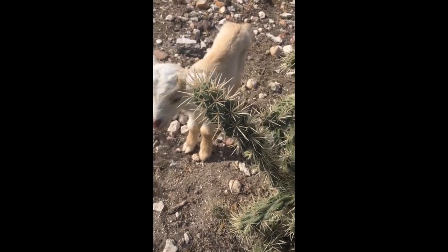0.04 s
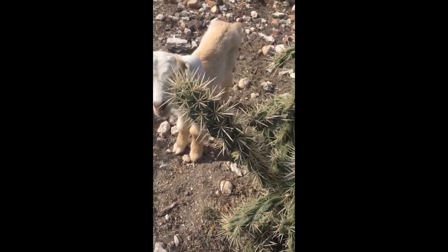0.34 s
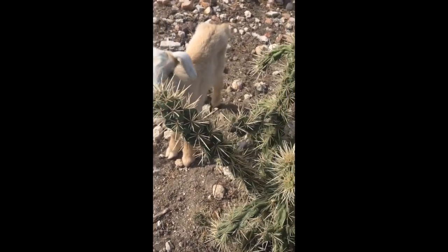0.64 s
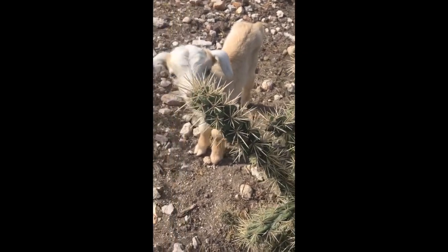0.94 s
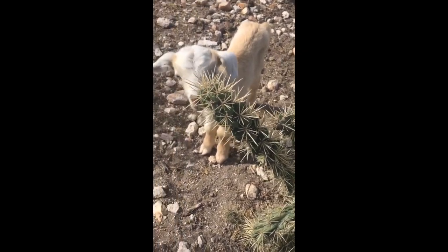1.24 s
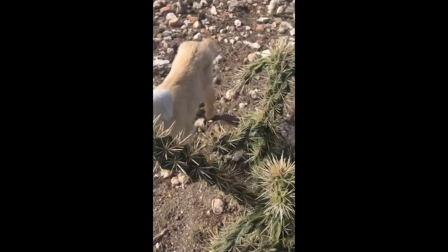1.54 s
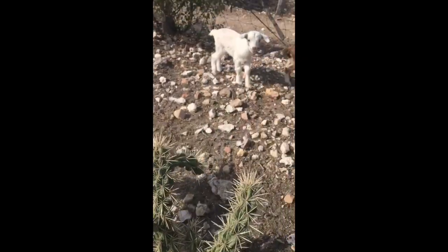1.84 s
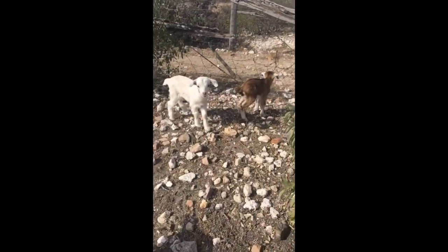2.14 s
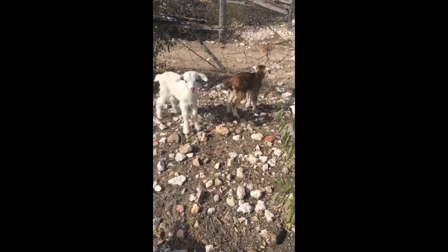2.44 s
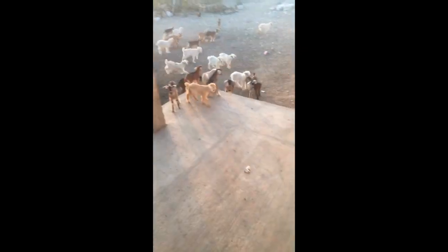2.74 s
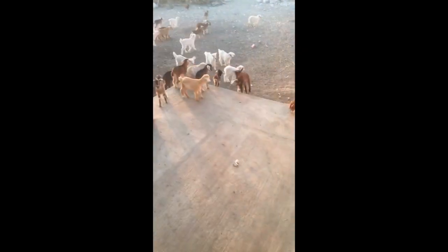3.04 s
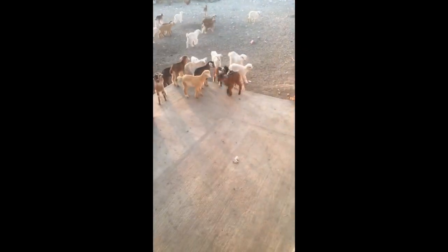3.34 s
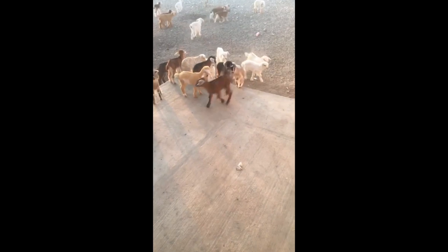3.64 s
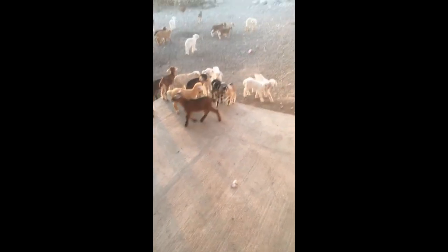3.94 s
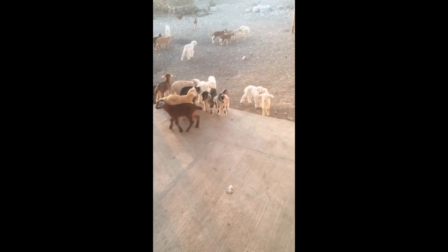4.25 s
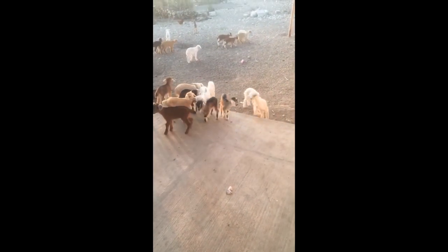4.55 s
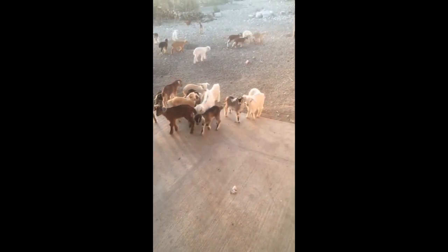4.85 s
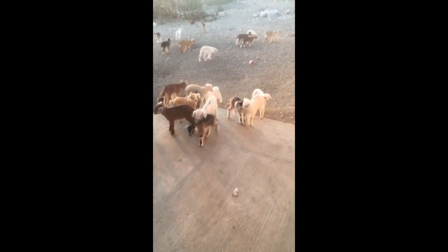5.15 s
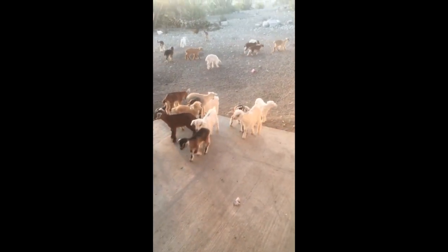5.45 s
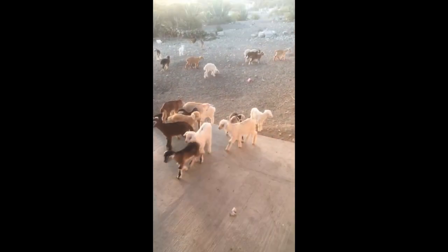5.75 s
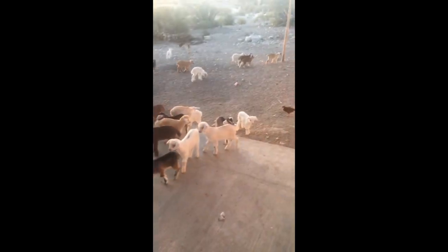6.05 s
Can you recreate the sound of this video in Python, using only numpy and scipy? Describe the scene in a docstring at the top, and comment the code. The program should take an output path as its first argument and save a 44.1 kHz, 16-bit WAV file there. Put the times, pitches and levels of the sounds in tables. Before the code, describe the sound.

Goat kids bleat at different pitches, first on stony ground, then by a porch with a whistling bird and wind on the microphone.

```python
"""Stony ground, then a short silence, then a concrete porch: goat kids bleat in both places.
On the stones a goat grunts and gives a creaky mutter, kids call far off, then two cry over each other
while pebbles click. By the porch four kids call in turn, a bird whistles and wind rumbles on the
microphone. Hooves knock in both places. A bleat is vocal-fold pulses through throat resonances,
throbbing about ten times a second on a slow contour."""
import sys
import numpy as np
from scipy import signal
from scipy.fft import rfft, irfft, next_fast_len
from scipy.io import wavfile
from scipy.ndimage import uniform_filter1d

SR = 44100
rng = np.random.default_rng(int(sys.argv[2]) if len(sys.argv) > 2 else 0)


def unload_wav(signal):
    """Save mono or channel-first audio to the path in sys.argv[1] as 16-bit WAV at rate SR, clipped to [-1, 1]."""
    wavfile.write(
        sys.argv[1],
        SR,
        np.round(np.clip(np.atleast_2d(signal).T, -1, 1) * 32767).astype(np.int16),
    )


N = 276948
TIME = np.arange(N) / SR
STONES_END_S, PORCH_START_S = 2.658, 2.987
CUTOFF_HZ = 15750


def from_db(db):
    """Decibels to gain."""
    return 10 ** (np.asarray(db) / 20)


def unit_rms(x):
    """Scale to unit power."""
    return x / np.sqrt(np.mean(x ** 2) + 1e-20)


def in_time(rows):
    """Each column after the first, interpolated over TIME."""
    times, *columns = np.transpose(rows)
    return [np.interp(TIME, times, column) for column in columns]


def butter(x, hz, kind, order=2):
    """Low- or high-pass."""
    return signal.sosfilt(signal.butter(order, min(hz, SR / 2 - 1), kind, fs=SR, output="sos"), x)


def drift(rate_hz, size):
    """Low-passed noise, unit RMS."""
    return unit_rms(butter(rng.standard_normal(size + SR // 4), rate_hz, "low")[-size:])


def resonate(x, hz, width_hz):
    """Two-pole resonance, unit peak gain."""
    r = np.exp(-np.pi * width_hz / SR)
    feedback = [1, -2 * r * np.cos(2 * np.pi * hz / SR), r * r]
    return signal.lfilter(np.array([1, 0, -1]) * (1 - r * r) / 2, feedback, x + 1e-18)


def coloured_noise(spectrum):
    """Unit-RMS noise with the given spectral shape."""
    hz, db = np.transpose(spectrum)
    size = next_fast_len(N)
    bins_hz = np.maximum(np.fft.rfftfreq(size, 1 / SR), 1)
    gain = from_db(np.interp(np.log(bins_hz), np.log(hz), db))
    return unit_rms(irfft(rfft(rng.standard_normal(size)) * gain, size)[:N])


def echoes(x, t60_s, wet_db, lowpass_hz):
    """Add dense, quickly dying reflections from ground and walls."""
    t = TIME[:SR // 2]
    response = rng.standard_normal(len(t)) * from_db(-60 * t / t60_s) * (t > .004)
    response = butter(response / np.linalg.norm(response), lowpass_hz, "low", order=1)
    return x + from_db(wet_db) * signal.fftconvolve(x, response)[:N]


# Spectra: f/Hz, relative density/dB
STONES_AIR_SPECTRUM = [(88, -48), (150, 4.5), (193, -20.5), (221, -2), (530, -10.5), (1340, -15.5),
                       (1630, -14), (1800, -13.5), (2600, -15.5), (15500, -22)]
BREEZE_SPECTRUM = [(8.8, -43.5), (15, -2.5), (49, 9.5), (113, -5), (179, -9.5), (265, -28), (300, -15),
                   (390, -64), (660, -120)]
# Breeze strength: t/s, level/dB
BREEZE_LEVELS = [(0.0, -60), (0.35, -66), (0.42, -56.5), (1.02, -62.5), (2.65, -61)]

def breeze(air_db):
    """A light, low breeze over steady open-air noise."""
    rumble = from_db(in_time(BREEZE_LEVELS)[0]) * coloured_noise(BREEZE_SPECTRUM)
    return rumble + from_db(air_db) * coloured_noise(STONES_AIR_SPECTRUM)


def knocks(contacts, relative_width):
    """Each contact is a short crunch in one broad resonance."""
    out = np.zeros(N)
    t = TIME[:SR // 5]
    for start_s, peak_db, hz, t60_s in contacts:
        crunch = rng.standard_normal(len(t)) * from_db(-60 * t / t60_s)
        burst = resonate(crunch, hz, relative_width * hz)
        out[round(start_s * SR):][:len(t)] += from_db(peak_db) * burst / np.abs(burst).max()
    return out


# Contacts: t/s, peak/dB (hooves: before low-pass), centre/Hz, t60/s
PEBBLE_CLICKS = [(.15, -56.5, 11000, 0.11), (.224, -57.5, 11000, 0.11), (.453, -55.5, 2830, 0.056),
                 (.592, -56, 4000, .025), (.599, -57, 12000, .04), (.702, -56, 13000, .04),
                 (1.461, -42.5, 5200, 0.011), (1.845, -37, 13000, 0.083)]
HOOF_KNOCKS = [(.378, -63, 280, 0.087), (.633, -48, 537, 0.015), (2.541, -50, 450, 0.033),
               (2.585, -47, 345, 0.022), (2.617, -52, 400, 0.045), (3.11, -42, 310, 0.075),
               (4.33, -41, 403, 0.11), (4.44, -40, 524, 0.044)]

def steps():
    """Pebbles click underfoot; hooves knock dully."""
    pebbles = knocks(PEBBLE_CLICKS, relative_width=.4)
    hooves = butter(knocks(HOOF_KNOCKS, relative_width=.4), 1140, "low")
    return pebbles + hooves


def throbbing(contour, count, sag_hz, dip_db, slowing=0, build_s=.01, lead_s=.048, tail_s=.048,
              glide=.0465, fade_db=8, plateau=1.89):
    """Span, pitch, level and roughness of a call; effort deepens and roughens its throbs."""
    times, hz, db = np.transpose(contour)   # throb tops, first to last
    share = np.linspace(0, 1, count)
    throbs_s = times[0] + (times[-1] - times[0]) * (share - slowing * share * (1 - share))
    start_s, end_s = times[0] - lead_s, times[-1] + tail_s
    span = np.flatnonzero((TIME > start_s) & (TIME < end_s))
    t = TIME[span]
    beat = np.interp(t, np.r_[start_s, throbs_s, end_s], np.r_[-.5, np.arange(count), count - .5])
    beat += .04 * np.sin(np.pi * beat) ** 2     # falls faster than it rises
    slack = 2 * np.abs(beat - np.round(beat))   # 0 on a throb, 1 in a trough
    outside = np.maximum(0, np.maximum((times[0] - t) / lead_s, (t - times[-1]) / tail_s))
    effort_db = np.interp(t, times, db) - db.max()
    scatter_db = 1.42 * np.interp(beat, np.arange(count + 1) - .5, rng.standard_normal(count + 1))
    depth = from_db(.3 * effort_db + scatter_db)
    drop_hz = sag_hz * depth * (1 - np.exp((start_s - t) / build_s))
    pitch_hz = (np.interp(t, times, hz) - drop_hz * slack ** 1.45) * (1 - glide * outside ** 3)
    trough_db = dip_db * depth * np.sin(np.pi * slack / 2) ** plateau
    level_db = db.max() + effort_db - trough_db - fade_db * outside ** 4
    # Slackening folds turn irregular just before each trough.
    roughness = from_db(1.1 * effort_db) * (1 + 3 * np.sin(np.pi * (beat + .15)) ** 4)
    return span, pitch_hz, level_db, roughness


def through_throat(source, throat, span, level_db):
    """Steep throat resonances colour the source; its power then follows level_db."""
    voice = sum(from_db(db) * resonate(resonate(source, hz, width_hz), hz, width_hz)
                for hz, width_hz, db in throat)
    power = uniform_filter1d(voice ** 2, SR // 50)
    out = np.zeros(N)
    out[span] = voice / np.sqrt(np.abs(power) + 1e-20) * from_db(level_db)
    return out


def bleat(call, throat, dulling, jitter, rasp, opening_s=.032, closing=0):
    """Vocal-fold pulses, unsteady when rough, duller when soft, with a puff of turbulence per cycle."""
    span, pitch_hz, level_db, roughness = call
    size = len(span)
    wobble = 1 + .00395 * drift(50, size) + jitter * roughness * drift(220, size)
    phase = 2 * np.pi * np.cumsum(pitch_hz * wobble) / SR
    mouth_closed = np.exp(-(np.arange(size) / SR / opening_s) ** 2)
    mouth_closed += closing * np.linspace(0, 1, size) ** 3   # narrows as the call tires
    slope = dulling * ((level_db.max() - level_db) / 20 + 5 * mouth_closed)
    harmonics = range(1, int(CUTOFF_HZ / pitch_hz.max()) + 2)
    pulses = sum(np.cos(k * phase) * k ** -slope * (k * pitch_hz < CUTOFF_HZ) for k in harmonics)
    pulses /= np.sqrt(len(harmonics) / 2)
    shimmer = 1 + .077 * roughness * drift(200, size)
    puffs = butter(rng.standard_normal(size) * (1 + np.cos(phase)), 5200, "high", order=1)
    source = pulses * shimmer + rasp * roughness * 10 ** -slope * puffs
    return through_throat(source, throat, span, level_db)


# Throb tops: t/s, pitch/Hz, level/dB
EARLY_GRUNT = [(.678, 284.3, -54.5)]
LATE_GRUNT = [(2.632, 244, -55.5)]
# Throats: f/Hz, width/Hz, gain/dB
EARLY_FORMANTS = [(278, 250, -5.5), (578, 100, 2), (2660, 330, 2.5), (3680, 680, 4.5), (4370, 230, 0)]
LATE_FORMANTS = [(244, 160, 0.5), (1800, 280, -12), (3800, 1000, -22.5)]

def grunts():
    """Two soft grunts of one throb each."""
    early = throbbing(EARLY_GRUNT, count=1, sag_hz=50.3, dip_db=13, lead_s=.041, tail_s=.023)
    late = throbbing(LATE_GRUNT, count=1, sag_hz=40.3, dip_db=14)
    return (bleat(early, EARLY_FORMANTS, dulling=.41, jitter=.021, rasp=.33)
            + bleat(late, LATE_FORMANTS, dulling=.073, jitter=.023, rasp=.48))


# Throb tops: t/s, pitch/Hz, level/dB
SHORT_CRY = [(.752, 528, -64.5), (.85, 534, -62.5)]
THIN_CRY = [(.888, 870, -86), (1.0, 882, -77), (1.23, 861, -75), (1.348, 855, -77.5)]
# Throats: f/Hz, width/Hz, gain/dB
SHORT_FORMANTS = [(1640, 250, -2), (3150, 660, -3)]
THIN_FORMANTS = [(880, 150, -1), (1720, 400, -22)]

def far_kids():
    """Far off, a short bleat, then a thin, high, held cry."""
    short = throbbing(SHORT_CRY, count=2, sag_hz=56.8, dip_db=12, tail_s=.058)
    thin = throbbing(THIN_CRY, count=5, sag_hz=48.5, dip_db=1)
    return (bleat(short, SHORT_FORMANTS, dulling=.48, jitter=.002, rasp=.03)
            + bleat(thin, THIN_FORMANTS, dulling=.5, jitter=.0075, rasp=.12))


# Throb tops: t/s, pitch/Hz, level/dB
MUTTER_CALL = [(.787, 243.4, -54), (.9, 237.5, -50), (1.122, 234.2, -51.5), (1.236, 222, -53),
               (1.348, 214.6, -68)]
# Throat: f/Hz, width/Hz, gain/dB
MUTTER_FORMANTS = [(268, 59, 8), (490, 200, 3), (877, 260, 3), (1645, 160, -1), (2130, 770, -3.5),
                   (2810, 240, 2), (3770, 950, 8), (4420, 130, 5), (5530, 460, 1.5)]

def creaky_mutter(lag, uneven_db, rasp):
    """Slack folds snap shut one by one: the rougher the voice, the later and more uneven each snap."""
    span, pitch_hz, level_db, roughness = throbbing(
        MUTTER_CALL, count=6, sag_hz=24.27, dip_db=21, slowing=.005,
        lead_s=.034, tail_s=.056, glide=.023, fade_db=16, plateau=4.1)
    roughness = np.minimum(roughness, 1)
    size = len(span)
    snaps, at = np.zeros(size), 0
    for delay, strength in zip(rng.random(size // 50), rng.standard_normal(size // 50)):
        if at >= size:
            break
        snaps[at] = from_db(uneven_db * roughness[at] * strength)
        stretch = 1 + lag * roughness[at] ** 2 * delay * from_db(level_db[at] - level_db.max())
        at += round(SR / pitch_hz[at] * stretch)
    source = unit_rms(snaps) + rasp * roughness * rng.standard_normal(size)
    return through_throat(source, MUTTER_FORMANTS, span, level_db)


# Throb tops: t/s, pitch/Hz, level/dB
LONG_CRY = [(1.487, 603, -59.5), (1.568, 619, -46.5), (1.64, 638.7, -41), (1.724, 655, -37.5),
            (2.08, 648.8, -35), (2.172, 625.4, -35.5), (2.273, 582, -43.5), (2.373, 615.4, -38.5),
            (2.468, 593, -41)]
LOW_CRY = [(1.658, 521, -59), (1.745, 507.4, -59.5), (1.842, 502.6, -38), (1.93, 382, -50),
           (2.08, 455, -52)]
# Throats: f/Hz, width/Hz, gain/dB
LONG_FORMANTS = [(630, 640, -18), (1337, 490, -15.5), (1734, 405, 1), (2390, 240, -3.5),
                 (3060, 1100, -12.5), (4372, 360, 4), (5060, 1800, -10), (7000, 700, -10),
                 (8680, 1700, -13.5), (11100, 2300, -21.5)]
LOW_FORMANTS = [(460, 150, -22.5), (1080, 340, -13), (1390, 170, -2), (3080, 500, -11), (4250, 970, 1),
                (6040, 1400, -3.5)]

def near_kids():
    """One kid bleats at length; a lower one cuts in."""
    long = throbbing(LONG_CRY, count=12, sag_hz=163.8, dip_db=14.5, slowing=.122,
                     build_s=.35, lead_s=.04, tail_s=.058, glide=.16, plateau=1.39)
    low = throbbing(LOW_CRY, count=5, sag_hz=90.5, dip_db=.5, slowing=.25, tail_s=.011, glide=.077)
    return (bleat(long, LONG_FORMANTS, dulling=.37, jitter=.004, rasp=.65, opening_s=.029, closing=.15)
            + bleat(low, LOW_FORMANTS, dulling=1.06, jitter=.0022, rasp=.3))


# Spectra: f/Hz, relative density/dB
PORCH_AIR_SPECTRUM = [(120, -4), (200, -2), (290, -3.5), (422, -9), (641, -8.5), (783, -12), (1590, -9),
                      (2380, -16.5), (3180, -15), (4920, -27), (6130, -26), (10400, -33.5), (15500, -39)]
HISS_SPECTRUM = [(1000, -25), (4000, 12), (7000, 0), (10000, 0), (15500, -6)]
# Background: t/s, air/dB, hiss/dB
PORCH_LEVELS = [(3.0, -50.5, -62), (3.72, -49.5, -59.5), (3.8, -50.5, -77), (4.9, -56, -71.5),
                (5.4, -53, -74), (6.28, -55, -79)]

def porch_air():
    """Outdoor noise and a high hiss, each at a varying level."""
    air_db, hiss_db = in_time(PORCH_LEVELS)
    air = from_db(air_db) * coloured_noise(PORCH_AIR_SPECTRUM)
    return air + from_db(hiss_db) * coloured_noise(HISS_SPECTRUM)


# Rumble: f/Hz, relative density/dB
WIND_SPECTRUM = [(8.8, -42), (15, -22), (32, 5), (50, 3.5), (78, -5.5), (113, -15), (216, -36),
                 (326, -40.5), (400, -51), (520, -54), (880, -120)]
# Wind strength: t/s, level/dB
GUST_LEVELS = [(3.0, -51), (3.8, -52), (4.55, -44.5), (4.78, -31), (5.0, -39), (5.35, -39), (5.6, -50.5),
               (5.72, -50.5), (5.79, -36), (6.28, -45)]
# Puffs: t/s, rumble/dB, eddy/dB
WIND_PUFFS = [(3.03, -42.5, -69), (3.281, -35.5, -65), (3.52, -41.5, -68), (3.62, -39.5, -66),
              (3.88, -41, -55), (4.491, -35, -69), (4.62, -38, -63), (4.73, -29.5, -40), (4.819, -29, -53),
              (4.9, -32.5, -50), (5.119, -30, -50), (5.38, -33.5, -65), (5.88, -51, -50), (6.0, -32.5, -66),
              (6.12, -35, -50.5), (6.199, -29, -55)]

def wind(puff_s, eddy_s, eddy_hz, eddy_width_hz):
    """Wind rumbles on the microphone; short puffs ride on it and shed smaller, higher eddies."""
    rumble_power = from_db(in_time(GUST_LEVELS)[0]) ** 2
    eddy_power = np.zeros(N)
    for peak_s, rumble_db, eddy_db in WIND_PUFFS:
        rumble_power += from_db(rumble_db) ** 2 * np.exp(-((TIME - peak_s) / puff_s) ** 2)
        eddy_power += from_db(eddy_db) ** 2 * np.exp(-((TIME - peak_s) / eddy_s) ** 2)
    rumble = coloured_noise(WIND_SPECTRUM)
    rumble /= np.sqrt(uniform_filter1d(rumble ** 2, SR // 16))   # flatten random swells
    eddies = resonate(rng.standard_normal(N), eddy_hz, eddy_width_hz)
    eddies = unit_rms(resonate(eddies, eddy_hz, eddy_width_hz))
    return np.sqrt(rumble_power) * rumble + np.sqrt(eddy_power) * eddies


# Throb tops: t/s, pitch/Hz, level/dB
RASPY_CALL = [(3.163, 660, -44), (3.39, 673, -45), (3.587, 652.5, -47), (3.695, 647, -48)]
STEADY_CALL = [(3.882, 642.5, -54), (3.96, 662, -46.5), (4.125, 670.5, -43), (4.3, 664.3, -46.5),
               (4.375, 651.6, -45), (4.461, 623.3, -47.5)]
FAINT_CALL = [(4.866, 503.6, -58.5), (4.948, 522.3, -50.5), (5.128, 507, -48.5), (5.222, 499, -55.5)]
LOUD_CALL = [(5.47, 540, -56), (5.51, 518.5, -53), (5.56, 542.8, -31), (5.664, 567, -27.5),
             (5.762, 552.5, -30), (5.866, 540.8, -31.5)]
# Throats: f/Hz, width/Hz, gain/dB
RASPY_FORMANTS = [(640, 440, -7.5), (1325, 170, 9), (1740, 890, 3.5), (3420, 210, 5), (3910, 570, 7),
                  (4620, 210, 4), (5030, 460, -2.5), (6260, 750, 0.5), (8700, 1200, -14.5)]
STEADY_FORMANTS = [(686, 82, -5), (1353, 97, 8.5), (2140, 560, -8), (2716, 156, 4.5), (3270, 610, 1),
                   (4120, 390, 2.5), (4720, 390, -2), (5350, 1030, -3.5), (7550, 1600, -17)]
FAINT_FORMANTS = [(1450, 450, 2.5), (2070, 280, -15), (3320, 470, 8.5), (5180, 600, -2), (6280, 560, 1.5)]
LOUD_FORMANTS = [(1117, 310, -13.5), (1530, 320, 3), (2133, 160, -9), (3550, 620, -1.5), (4330, 450, -4.5),
                 (5440, 1200, -4.5), (6500, 420, -6), (8630, 1330, -16.5), (11700, 580, -31)]

def herd():
    """Four kids bleat in turn, a few metres off."""
    raspy = throbbing(RASPY_CALL, count=6, sag_hz=132.5, dip_db=17, slowing=.036,
                      tail_s=.026, glide=.0322)
    steady = throbbing(STEADY_CALL, count=8, sag_hz=23.78, dip_db=6.5, slowing=.036,
                       lead_s=.04, tail_s=.05)
    faint = throbbing(FAINT_CALL, count=5, sag_hz=67.4, dip_db=18, slowing=.099, lead_s=.06, glide=.033)
    loud = throbbing(LOUD_CALL, count=5, sag_hz=66.2, dip_db=10.5, slowing=.041,
                     lead_s=.055, glide=.0824)
    return (bleat(raspy, RASPY_FORMANTS, dulling=.087, jitter=.0058, rasp=.92)
            + bleat(steady, STEADY_FORMANTS, dulling=.11, jitter=.0088, rasp=.36)
            + bleat(faint, FAINT_FORMANTS, dulling=.27, jitter=.0078, rasp=.5)
            + bleat(loud, LOUD_FORMANTS, dulling=.053, jitter=.0037, rasp=.51))


# Whistles: t/s, length/s, first/Hz, last/Hz, level/dB
BIRD_WHISTLES = [(3.235, 0.085, 4470, 2630, -49.5), (4.427, 0.13, 4430, 2800, -56),
                 (5.128, .2, 3940, 2332, -57), (5.389, 0.14, 4470, 3640, -62)]

def bird(waver, bend):
    """Thin whistles that slide down ever faster."""
    out = np.zeros(N)
    for start_s, length_s, first_hz, last_hz, db in BIRD_WHISTLES:
        size = int(length_s * SR)
        progress = np.linspace(0, 1, size)
        hz = (first_hz + (last_hz - first_hz) * progress ** bend) * (1 + waver * drift(570, size))
        envelope = from_db(db) * np.sqrt(2 * np.abs(np.sin(np.pi * progress)))
        out[round(start_s * SR):][:size] += envelope * np.sin(2 * np.pi * np.cumsum(hz) / SR)
    return out


def scene():
    """Stony ground, then the porch; steps in both."""
    close = grunts() + creaky_mutter(lag=.9, uneven_db=1.5, rasp=.4)
    stones = echoes(close, t60_s=.11, wet_db=-8, lowpass_hz=6030)
    stones += echoes(far_kids() + near_kids(), t60_s=.15, wet_db=-11.5, lowpass_hz=6250)
    stones += breeze(air_db=-68.5)
    calls = herd() + bird(waver=.031, bend=1.6)
    porch = echoes(calls, t60_s=.17, wet_db=-2.5, lowpass_hz=7100)    # quick porch reflections
    porch = echoes(porch, t60_s=.67, wet_db=-10.5, lowpass_hz=1800)   # dull tail from the yard
    porch += porch_air() + wind(puff_s=.026, eddy_s=.017, eddy_hz=143, eddy_width_hz=65)
    return (stones * (TIME < STONES_END_S) + porch * (TIME > PORCH_START_S) + steps())[None]


def record(dry):
    """The microphone notches the treble; a steep low-pass cuts the top."""
    notch_hz = 10370
    notched = signal.lfilter(*signal.iirnotch(notch_hz, Q=40, fs=SR), dry)
    return signal.sosfilt(signal.ellip(10, .1, 80, CUTOFF_HZ, fs=SR, output="sos"), notched)


dry = scene()
out = record(dry)
unload_wav(out)
```